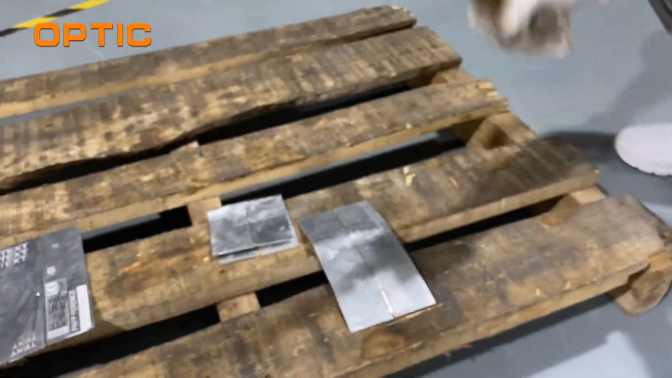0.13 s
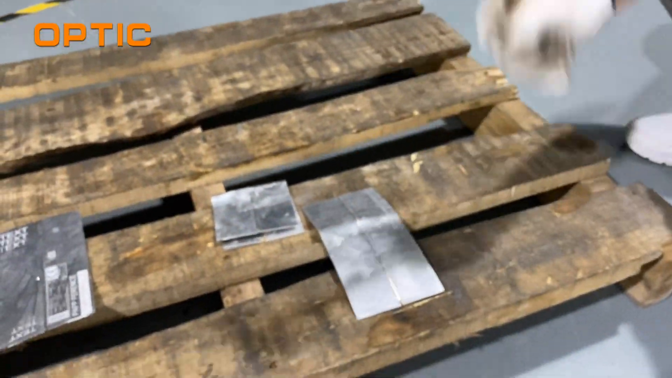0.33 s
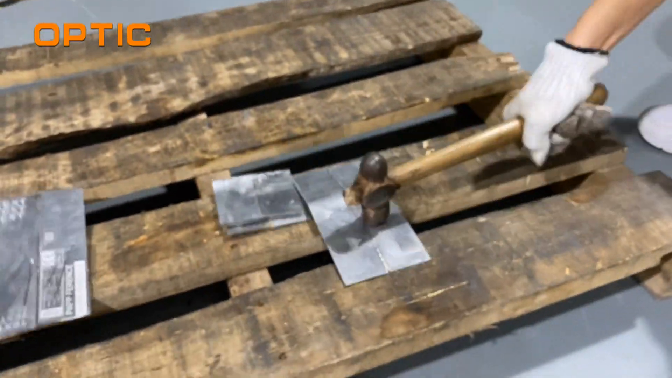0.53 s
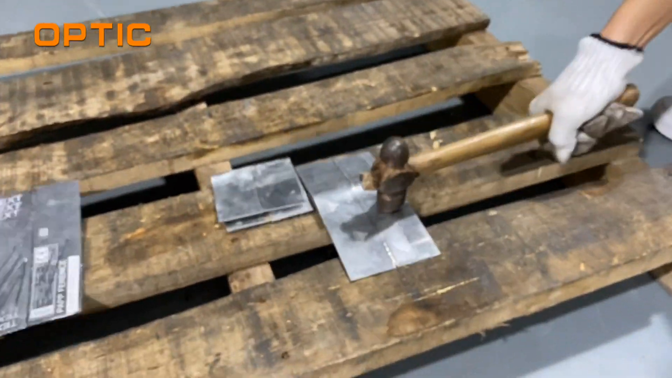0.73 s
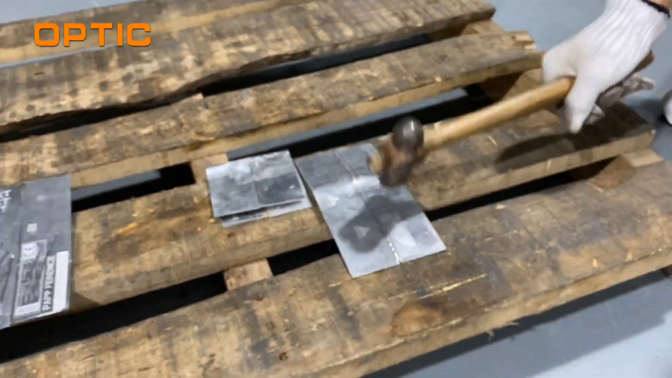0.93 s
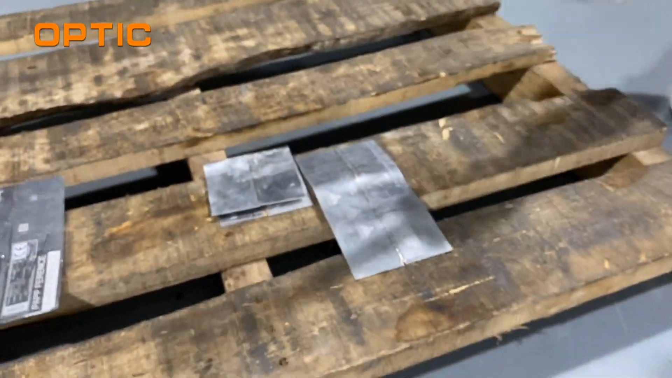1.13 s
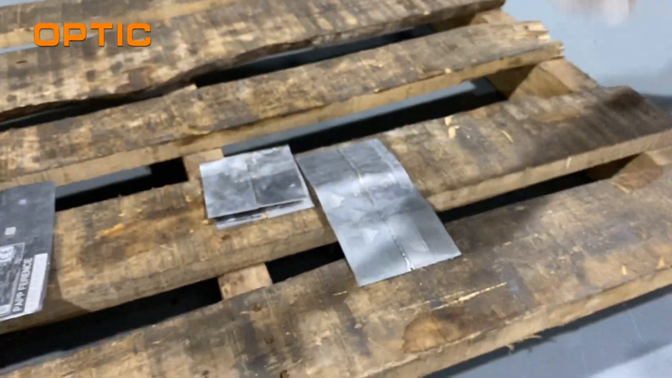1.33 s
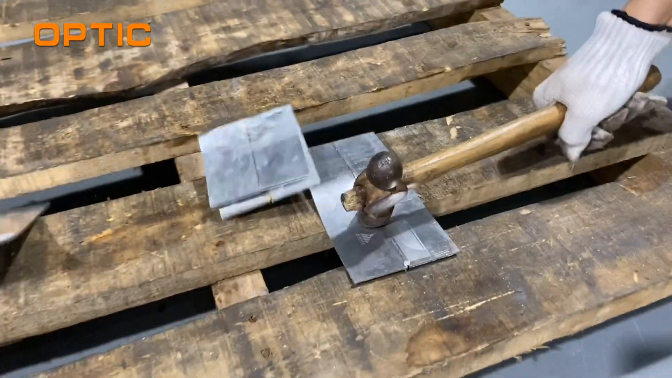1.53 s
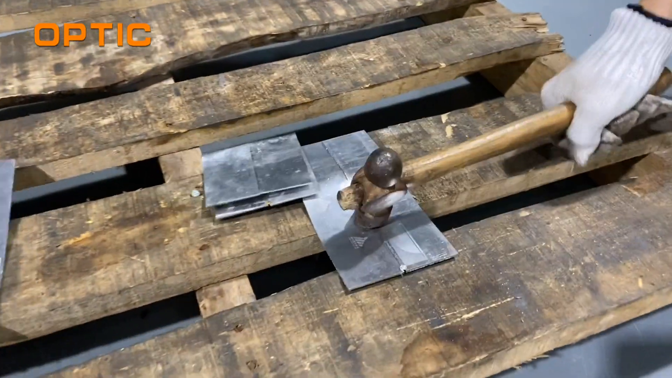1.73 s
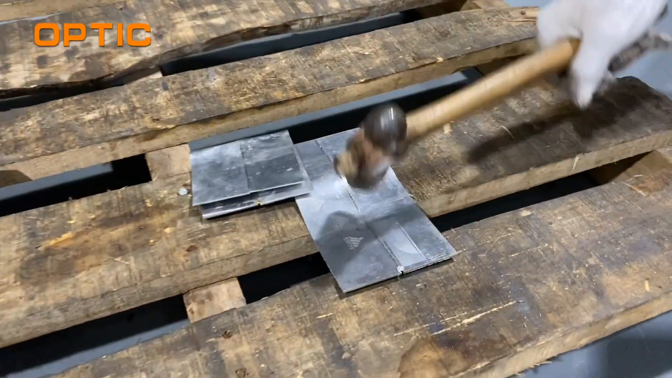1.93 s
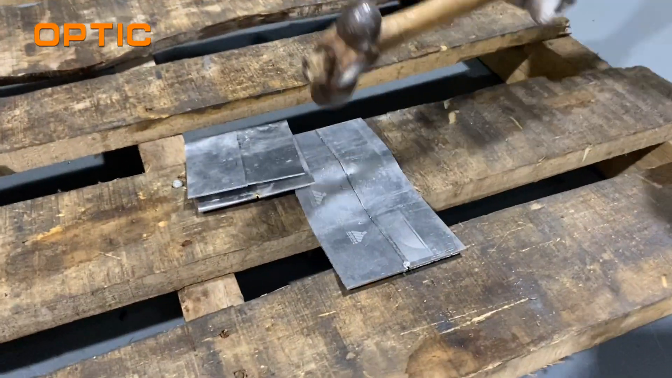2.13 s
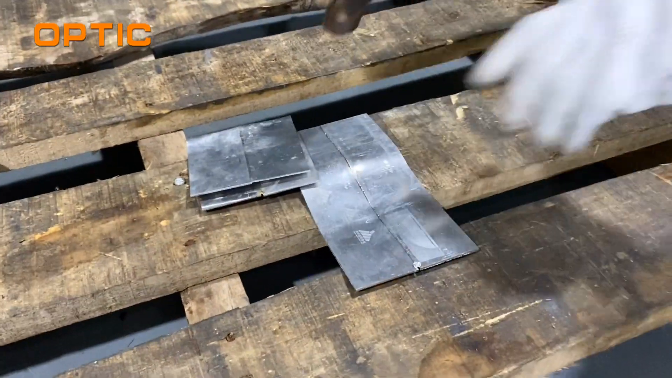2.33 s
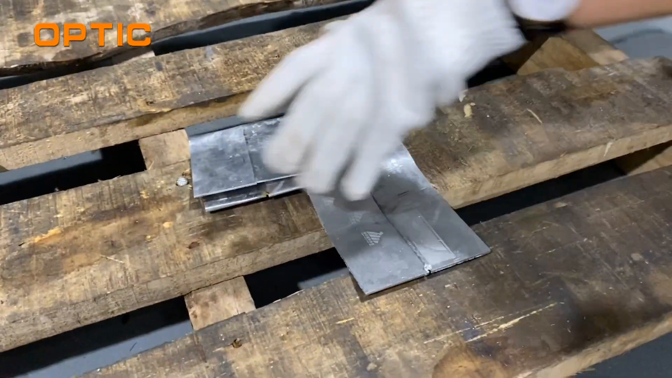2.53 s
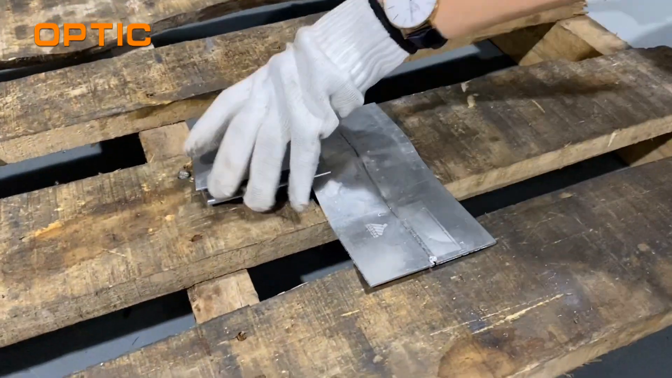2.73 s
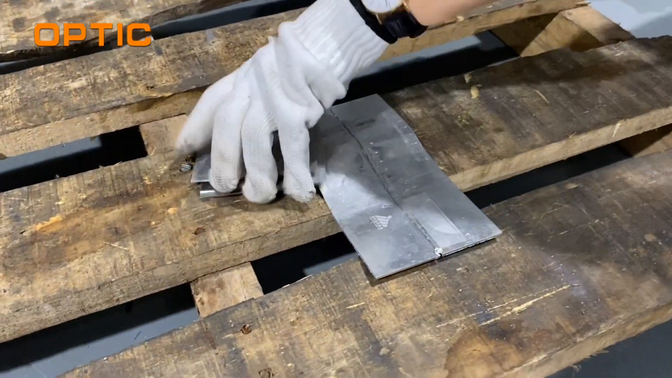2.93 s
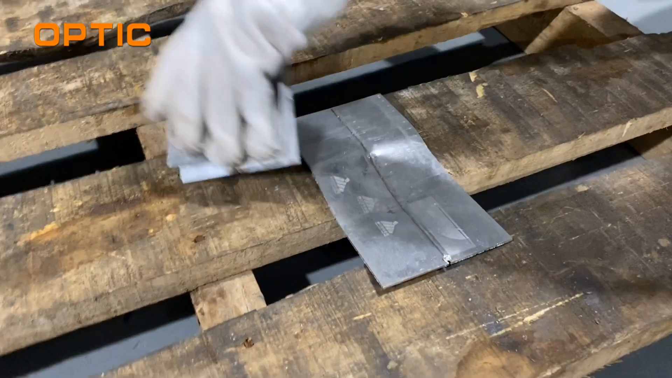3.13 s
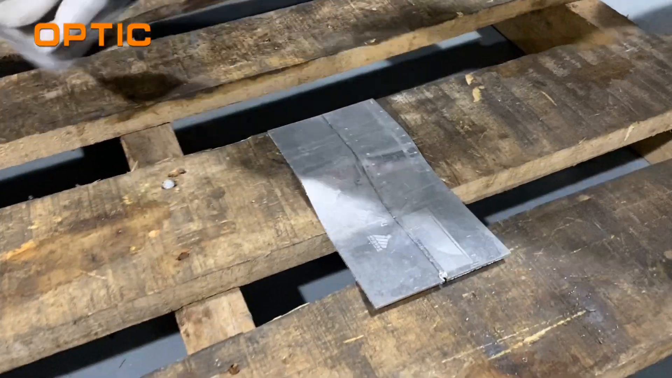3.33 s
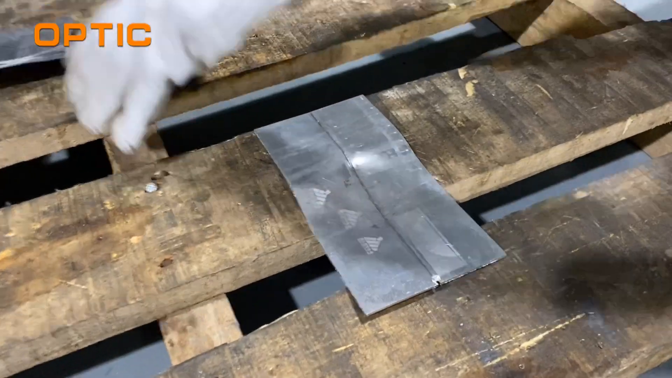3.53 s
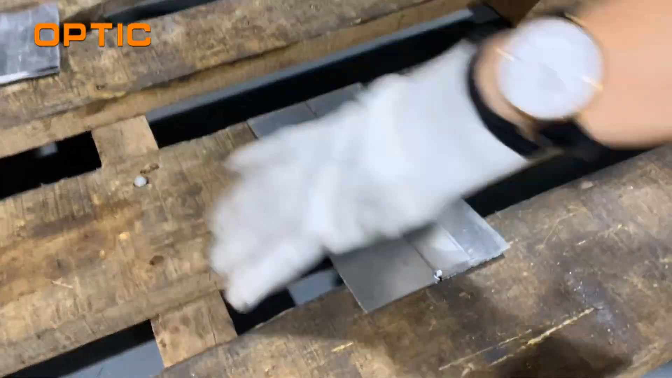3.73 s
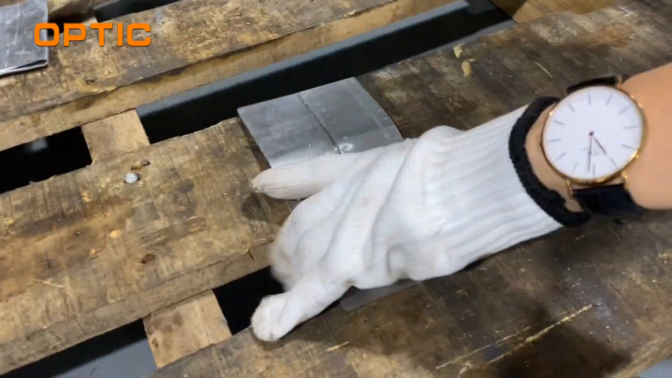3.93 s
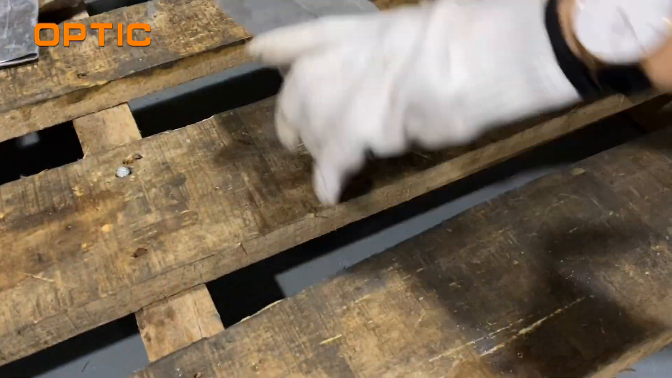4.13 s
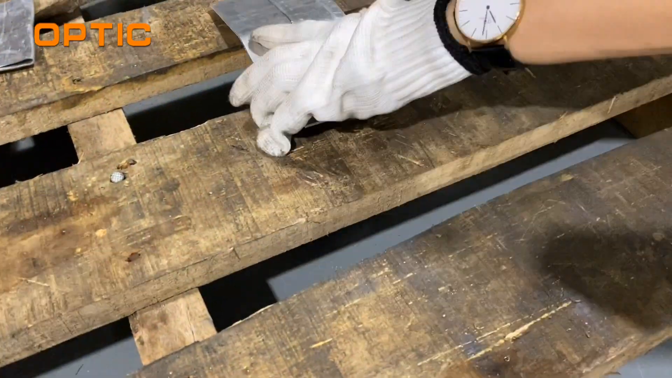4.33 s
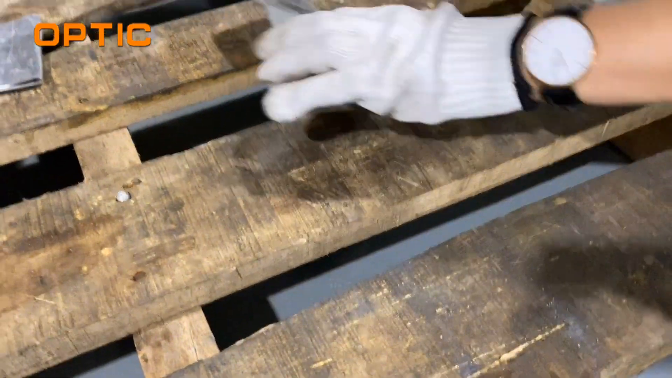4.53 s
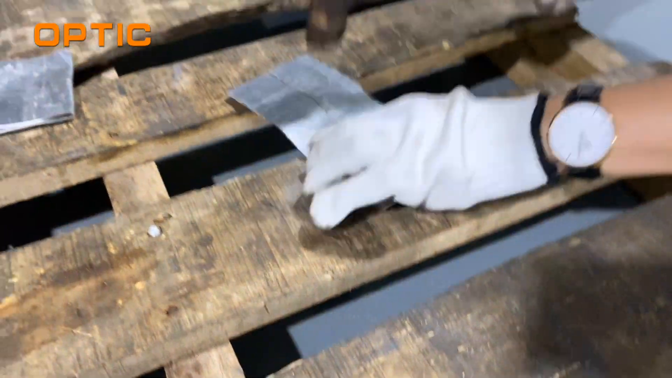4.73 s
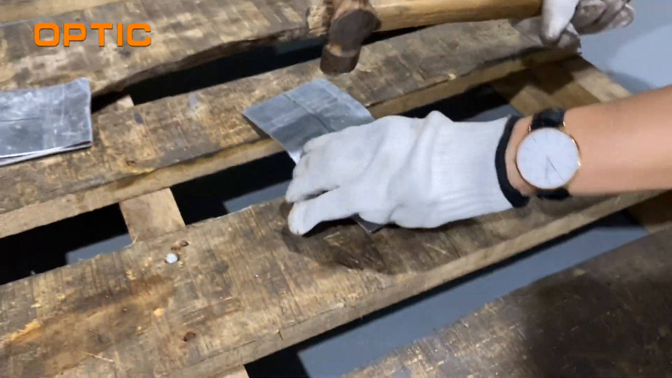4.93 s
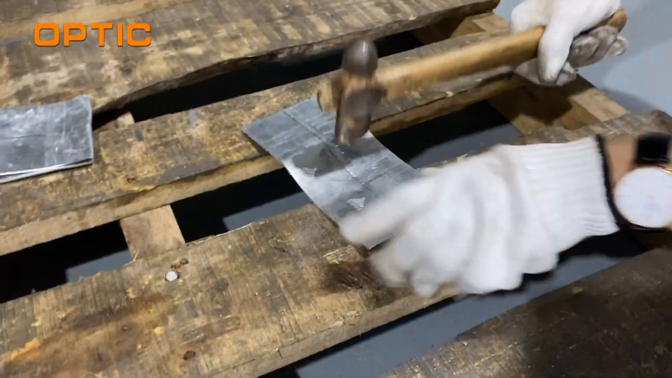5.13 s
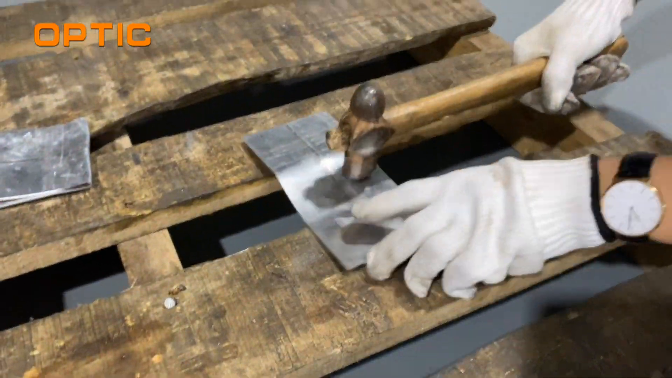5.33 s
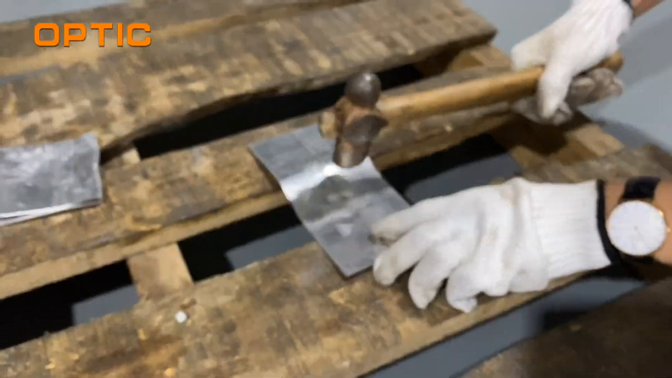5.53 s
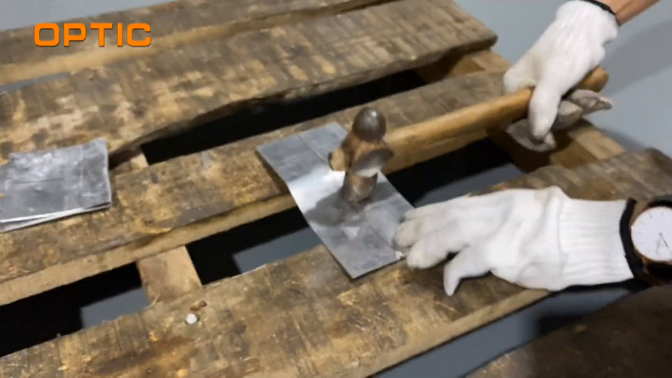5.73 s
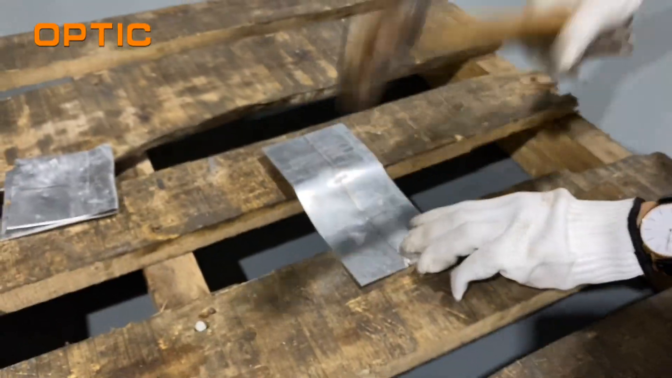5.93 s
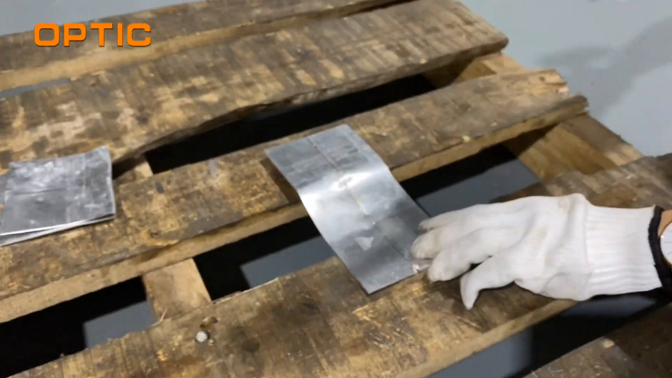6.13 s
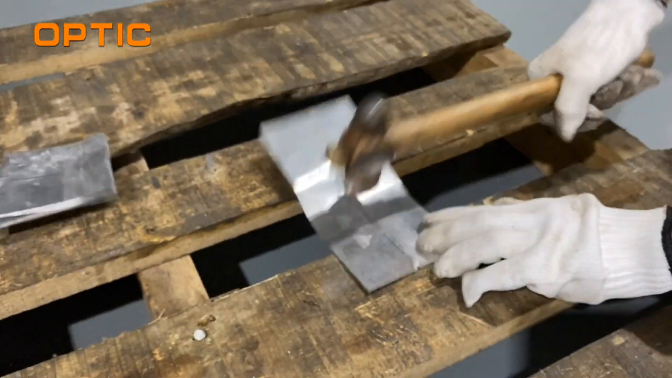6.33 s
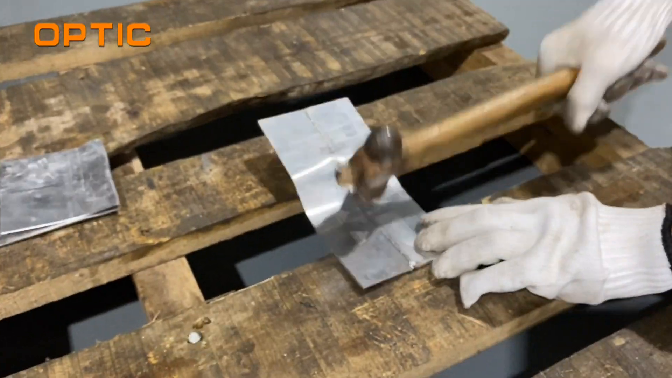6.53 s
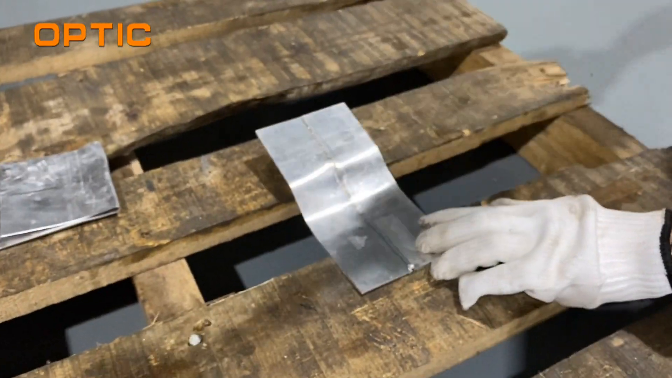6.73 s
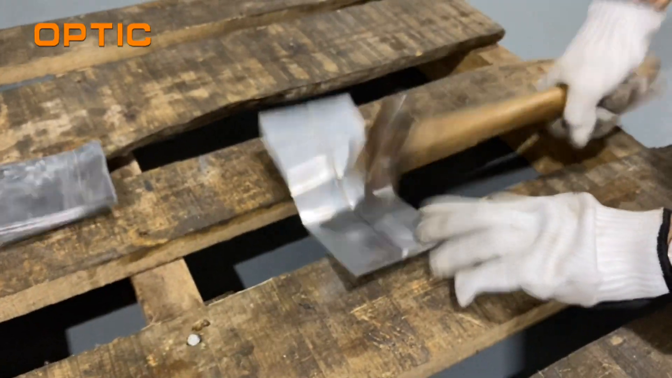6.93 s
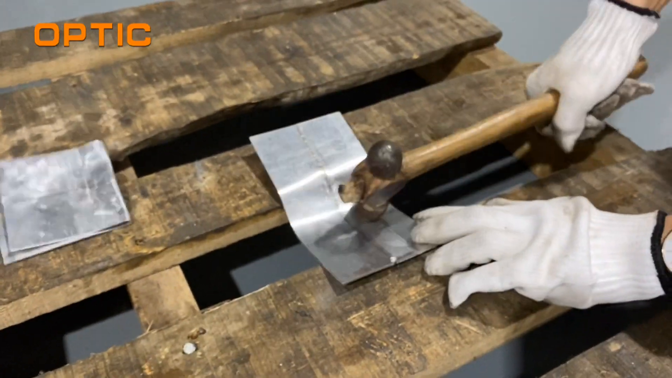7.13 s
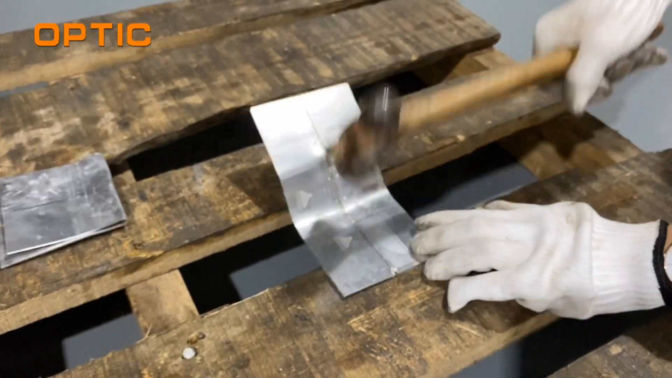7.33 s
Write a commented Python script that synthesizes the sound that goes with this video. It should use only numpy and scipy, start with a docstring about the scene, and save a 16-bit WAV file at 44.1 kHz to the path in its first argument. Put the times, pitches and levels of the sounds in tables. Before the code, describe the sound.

A low, slightly fluttering ventilation rumble fills a reverberant workshop, with the echo of an earlier blow fading at the start. At 0.46 s a hammer hits thin aluminium on a wooden pallet: a loud, bright, noisy crack with short plank thud and boom, rebounding at 0.54 s while a loose folded piece rattles until about 0.7. A second blow at 1.47 rebounds at 1.54, with clinks to 1.8. The echo dies away. Around 2.9-3.2 faint scrapes on wood; at 3.48-3.75 the tossed piece clinks, rings and rocks to rest. Soft sliding at 4.4 and 4.7, then the sheet lands with a hollow knock at 4.76. Light taps with bounces come at 5.2 and 5.7, then heavy cracks at 6.3 and 6.98, each rebounding about 0.1 s later, echo continuing to the end near 7.4. The close stereo microphone ducks after loud hits and recovers.

```python
"""Hammering a folded aluminium sheet

Over ventilation (coloured noise), a hammer on sheet and pallet rebounds: noise cracks and damped modes.
A folded piece jumps and is tossed aside, ticking, ringing and rocking to rest; the sheet is laid down knocking.
A glove slides metal over wood: grainy noise excites its damped modes. Decaying noise gives the workshop's echo.
The camera's gain control ducks loud sounds, then slowly recovers."""
import sys
import numpy as np
from scipy import signal
from scipy.fft import rfft, irfft, next_fast_len
from scipy.io import wavfile
from scipy.ndimage import uniform_filter1d, minimum_filter1d, map_coordinates

SR = 44100
rng = np.random.default_rng(int(sys.argv[2]) if len(sys.argv) > 2 else 0)


def master_out(mix):
    """Clip the mix to full scale and print it as 16-bit PCM to the path in sys.argv[1]."""
    frames = np.transpose(np.atleast_2d(mix))
    ceiling = np.clip(frames, -1, 1)
    pcm = np.round(ceiling * 32767).astype(np.int16)
    wavfile.write(sys.argv[1], SR, pcm)


N = 325458  # length [samples]
LEAD = SR  # samples before time zero, in which an earlier blow starts its echo

# All levels are relative [dB]; t60 is the time to decay by 60 dB.
# ventilation spectrum: (frequency [Hz], density [dB/Hz])
AIR_SPECTRUM = [(22, -41.5), (40, -8), (90, 0), (125, -3), (160, 1.5), (190, -9.5), (250, -16.5),
                (320, -10), (500, -20), (1200, -27.5), (3000, -39), (7000, -50), (16000, -68.5)]
# ventilation strength: (time [s], level [dB])
AIR_LEVEL = [(0, -42), (1.2, -44), (3, -49), (7.3, -41.5)]
# left-right likeness of ventilation and scraping: (frequency [Hz], coherence [0-1])
AIR_COHERENCE = [(100, .95), (290, 0.85), (640, 0.31), (1400, 0.17), (8000, 0.097)]

# hammer blows and rebounds: (time [s], level [dB], hardness [dB], plank thud [dB], pallet boom [dB],
#   ping [Hz], ping level [dB], rebound time [s], rebound level [dB], rebound hardness [dB],
#   rebound ping [Hz], rebound ping level [dB])
BLOWS = [(-.56, -4.5, 13, -5, -23, 1620, -9, -.48, -22, 5, 2150, -9),
         (.4602, -3.5, 4.5, -8.5, -7.5, 2112, -9, .541, -15.5, 13, 2050, -9),
         (1.4712, -8.5, 7, -5.5, -10.5, 740, -8, 1.5426, -18, 4.5, 1580, -9),
         (5.208, -25, 8.5, -22, -19.5, 3150, -9, 5.277, -24.5, 6, 3900, -9),
         (5.686, -19.5, 4, -28, -26.5, 1937, -8, 5.7592, -20, 0, 3590, -8),
         (6.2974, -7, 7, -3, -19, 6180, -15, 6.4125, -14, 7, 3440, -11),
         (6.981, -5.3, 3.5, 0, -17, 2120, -7, 7.09, -16.5, -8, 590, -6)]
# the plank with the sheet pressed on it: (frequency [Hz], level [dB], t60 [s])
PLANK_MODES = [(540, 1, 0.042), (657, -2, .05), (800, 4, 0.025), (955, 4.5, 0.045), (1168, 2.5, 0.028),
               (1620, -.5, 0.02), (2134, -3, 0.04), (3330, -3, 0.022), (3950, -9, .04), (5400, -11, 0.042),
               (6200, -11.5, 0.06), (7100, -12, .04), (9800, -12, .03)]
# the plank bending as a whole, and the pallet under it: (frequency [Hz], level [dB], t60 [s])
THUD_MODES = [(285, 0, .035), (360, 2, 0.028), (455, 4, 0.032)]
# the whole pallet: (frequency [Hz], level [dB], t60 [s])
PALLET_MODES = [(68, 0.5, 0.05), (117, 2.5, 0.045), (235, -2, .025)]
# the sheet ringing freely: (frequency [Hz], level [dB], t60 [s])
SHEET_MODES = [(497, 1, 0.11), (775, -16, 0.45), (945, 1.5, 0.16), (1070, -1.5, 0.054), (1190, -1, 0.08),
               (1290, -6, 0.11), (1680, -5, 0.11), (2347, -16.5, 0.55), (2735, -19, 0.22), (3160, -27, .8),
               (3980, -21, 0.12), (6170, -32, .3), (6470, -31, .25)]
# noise of a blow on the sheet: (frequency [Hz], density [dB/Hz])
CRACK_SPECTRUM = [(60, -13.5), (300, -2), (1000, 2.5), (1400, -.5), (2100, 0), (2700, -2.5), (3400, -1),
                  (4600, -5), (6000, -4.5), (10000, -10), (15000, -17.5)]
# a heavier blow stays longer in contact: length at 0 dB [s], growth [dB per dB]
CONTACT_S, CONTACT_GROWS = 0.01, .6
RISE_SHARE = 0.07  # rise time over contact length
# a short, soft sound swells just before each blow: lead and length [s], level [dB],
# extra growth [dB per dB], rise time [s]
LEAD_IN_S, LEAD_IN_DB, LEAD_IN_GROWS, LEAD_IN_RISE_S = .006, -4, 1.1, .007
# the rebound lands askew: its contact is longer and it moves the wood less
ASKEW_STRETCH, ASKEW_WOOD_DB = 1.6, -4.5
# one last dull hop: flight over the first, level re rebound [dB], contact [s]
SETTLE_SHARE, SETTLE_DB, SETTLE_S = 0.43, -9, 0.032
SOFT_HARD_DB = -3.5  # hardness of the lead-in and of the last hop
BOOM_PAN_DB = -2.5  # the boom is this much weaker at the left port and stronger at the right
CRUSH = 0.115  # a heavy blow crushes the metal and drowns the modes: dB of crack per dB of level
SNAP_GROWS = -.15  # the bright first touch stands out more in light taps: dB per dB of level
PING_T60 = .038  # [s], one bending mode of the sheet, brought out by the strike spot

# loose metal touching the boards: (time [s], level [dB], share of free ring time [0-1], hardness [dB])
TOUCHES = [(.485, -18, 0.6, -1), (.503, -20, .4, -1), (.537, -17, 0.55, 2.5), (.551, -16, 0.5, 5),
           (.59, -22, 0.5, 6), (.69, -35.5, 0.2, 3), (1.492, -21, .4, -2), (1.528, -20.5, 0.4, 4),
           (1.546, -24, 0.7, 3), (1.581, -27, 0.4, 4), (1.673, -25, 0.4, 0), (1.699, -25.5, 0.43, 2),
           (1.755, -30, 0.52, 3), (1.822, -37.5, .35, 0.5), (2.99, -50.5, 0, -3.5), (3.041, -48.5, 0.1, -2),
           (3.204, -48, .2, -3.5), (3.479, -29, 0.3, -2), (3.504, -26, 0.62, 6.5),
           (3.519, -25.5, 0.87, 4.5), (3.536, -28.5, .9, 4), (3.58, -34, 1, 0), (3.617, -36.5, 1, 0.5),
           (3.655, -35.5, 0.9, -4), (3.671, -33.5, 0.55, -3), (3.741, -37.5, 0.7, -3),
           (4.341, -60, 0.2, 0.5), (5.281, -36, .9, 0), (5.311, -34.5, 0.8, -2), (5.747, -30.5, 0, -5),
           (6.322, -23, .2, 0), (7.024, -28, 0.1, 4)]
# the folded piece: (frequency [Hz], level [dB], t60 [s])
PIECE_MODES = [(710, -13, 0.45), (942, -10, 0.45), (1650, -9.5, 0.42), (1910, -4, .27), (2290, -7.5, 0.55),
               (2460, -8.5, 0.45), (2800, -10, .25), (3074, -3, 0.2), (3430, -1, 0.26), (4140, 0, 0.24),
               (4420, 0, 0.22), (4700, -3, .08), (5150, -1, 0.26), (5990, -.5, 0.23), (6900, -4, 0.2),
               (8100, -8, 0.088), (9260, -8, .12), (10400, -4.5, .12), (14300, -2, 0.12)]
# noise of a light metal touch: (frequency [Hz], density [dB/Hz])
CHINK_SPECTRUM = [(100, -34), (450, -8), (750, 0), (1300, -3.5), (2000, -1), (5000, -3), (8000, -6),
                  (15000, -8)]
RATTLE_S, RATTLE_DB = .007, -7  # rattling leaves: mean time between ticks, change per tick
PINNED_DB = -9.5  # a piece with no free ring time rings this much less

# the glove pushes metal over wood: (time of the fastest motion [s], level [dB], run-up [s])
PUSHES = [(2.91, -65.5, 0.13), (3.045, -55.5, .04), (3.19, -52.5, 0.066), (4.44, -60.5, 0.06),
          (4.72, -59.5, 0.07)]
# a push swells by this much over its run-up, and falls as much in the stop time
PUSH_SWELL_DB, PUSH_STOP_S = 18.5, 0.033
# metal sliding on wood: (frequency [Hz], density [dB/Hz])
SCRAPE_SPECTRUM = [(200, -20), (900, 3), (2200, 3), (4000, -5), (7500, -3), (15000, -14)]

# the tossed piece rocks on its corners: (time [s], level [dB], pitch of the board [Hz])
ROCKS = [(3.522, -39, 600), (3.595, -41, 580), (3.638, -43, 680), (3.665, -42, 900), (3.684, -43, 700),
         (3.722, -43, 660), (3.757, -43, 720), (3.79, -47, 700)]
# the sheet is laid back on the plank: (time [s], level [dB])
LAID = [(4.6, -52), (4.759, -27.5), (4.7635, -35), (4.7715, -33), (4.783, -36)]

# decay of the workshop's echo: (frequency [Hz], t60 [s])
HALL_T60 = [(150, 0.68), (500, 1.16), (1300, 1.33), (1600, 1.62), (1950, 1.3), (3000, 1.18), (6000, 0.96),
            (10000, 0.6), (15000, 0.42)]
# colour of the echo: (frequency [Hz], level [dB])
HALL_COLOUR = [(100, -18), (300, -2), (700, -.7), (1250, -.5), (1620, -.5), (2400, -1.8), (4000, -2),
               (8000, -3.5), (15000, -6)]
# left-right likeness of the echo: (frequency [Hz], coherence [0-1])
HALL_COHERENCE = [(250, .85), (600, .35), (1500, .05)]
# colour of the whole sound, with dips near 8.4 and 12.2 kHz: (frequency [Hz], level [dB])
COLOUR = [(6800, 0), (8400, -4), (9400, 3), (10700, 3), (12200, -10.5), (13700, 3.5), (15000, 1),
          (16000, -4.5)]
TOP_HZ = 15900  # upper band limit of the whole sound


def amp(db):
    """Logarithmic levels: decibels to amplitude gain."""
    return 10 ** (np.asarray(db) / 20)


def unit(x):
    """Normalised mean power: scale to rms 1."""
    return x / np.sqrt(np.mean(x ** 2) + 1e-20)


def punch(x):
    """Normalised impulse energy: scale a stereo hit to the energy of 10 ms at rms 1."""
    return x / np.sqrt(np.sum(x ** 2) / (2 * SR * .01) + 1e-20)


def along(points, hz):
    """Logarithmic frequency scale: interpolate (frequency, value) points along it."""
    f, v = np.transpose(points)
    return np.interp(np.log(hz + 1), np.log(f + 1), v)


def curve(rows):
    """Linear interpolation: one value per sample from (time, value) rows."""
    return np.interp(np.arange(N) / SR, *np.transpose(rows))


def wobble(rate):
    """Slow random fluctuation: a smooth curve through rate random knots a second."""
    knots = rng.standard_normal(int(N * rate / SR) + 4)
    return map_coordinates(knots, [np.arange(N) * rate / SR])


def filtered(x, response):
    """Linear filtering: multiply the spectrum of x by a response of frequency."""
    n = x.shape[-1]
    m = next_fast_len(n + SR // 8)
    return irfft(rfft(x, m) * response(np.fft.rfftfreq(m, 1 / SR)), m)[..., :n]


def noise(spectrum, coherence, size):
    """Partial coherence: coloured noise of rms 1, mid and side mixed to a given left-right likeness."""
    def mid_side_gains(hz):
        angle = np.arccos(np.clip(along(coherence, hz), -1, 1)) / 2
        return amp(along(spectrum, hz)) * [np.cos(angle), np.sin(angle)]
    mid, side = filtered(rng.standard_normal((2, size)), mid_side_gains)
    return unit(np.array([mid + side, mid - side]))


def fade(t, t60):
    """Exponential decay: full level before t = 0, then 60 dB down every t60."""
    return np.exp(-np.log(1000) * np.maximum(t, 0) / t60)


def ring(modes, rise, size):
    """Modal superposition: random strengths per strike; high modes reach the two ports out of step."""
    t = np.arange(size) / SR
    out = np.zeros((2, size))
    for hz, db, t60 in modes:
        strength, detune, skew = rng.standard_normal(3)
        port_skew = skew * min(hz / 4000, 1) * np.array([[1], [-1]])
        phase = rng.uniform(0, 2 * np.pi) + port_skew
        pitch = hz + detune * .5 / t60  # the load of the contact shifts the damped modes most
        out += amp(db + 2 * strength) * fade(t, t60) * np.sin(2 * np.pi * pitch * t + phase)
    return punch(out * (1 - np.exp(-t / rise)))


def damped(modes, share):
    """Added damping: pressing by hand or hammer leaves only a share of the ring time."""
    return np.array(modes) * [1, 1, share]


def folded(modes, spread, count):
    """Beating of near-equal modes: the leaves' clusters widen with frequency."""
    leaves = np.tile(modes, (count, 1))
    hz = leaves[:, 0]
    detune = spread * np.minimum(hz / 3000, 1) * rng.standard_normal(len(hz))
    return np.c_[hz * (1 + detune), leaves[:, 1:]]


def contact(spectrum, length, t60, size):
    """Impact noise: metal chatters for the length of the contact; its treble dies sooner than its body."""
    t = np.arange(size) / SR
    chatter = noise(spectrum, [(400, 0.75), (2000, 0.35), (8000, 0.093)], size=size)
    treble = filtered(chatter, lambda hz: hz ** 2 / (hz ** 2 + 4500 ** 2))
    body = (chatter - treble) * (1 - np.exp(-t / 0.0021)) * fade(t - length, t60)
    return punch(body + treble * fade(t - 0.23 * length, 0.34 * t60))


def snap(t60):
    """Impulsive excitation: a brief bright noise for the first hard touch on aluminium."""
    t = np.arange(SR // 50) / SR
    hiss = noise([(2000, -20), (6000, -2), (15000, 0)], [(8000, .7)], size=len(t))
    return punch(hiss * fade(t, t60))


def hardened(x, db, corner_hz):
    """Contact stiffness: a hard contact lifts the treble, a soft one dulls it."""
    return filtered(x, lambda hz: 1 + (amp(db) - 1) * 1j * hz / (corner_hz + 1j * hz))


def add(track, s, sound):
    """Linear superposition: mix a sound into the track at time s."""
    start = LEAD + round(s * SR)
    part = track[:, start:start + sound.shape[1]]
    part += sound[:, :part.shape[1]]


def hall(x, grain_db=2.5):
    """Reverberation: convolve with a fresh noise tail whose reflections clump and whose t60 varies with pitch."""
    diffuse = noise([(1000, 0)], HALL_COHERENCE, size=3 * SR // 2)
    hz, t, z = signal.stft(diffuse, SR, nperseg=256)
    build_up = 1 - np.exp(-t / 0.0045)
    clumps = amp(grain_db * rng.standard_normal(len(t)))
    decay = fade(t, along(HALL_T60, hz)[:, None])
    tail = signal.istft(z * build_up * clumps * decay, SR, nperseg=256)[1]
    tail = filtered(tail / np.linalg.norm(tail[0]), lambda f: amp(along(HALL_COLOUR, f)))
    return signal.fftconvolve(x, tail, axes=1)


def ventilation(flutter_db=1):
    """Broadband flow noise: a low, slightly unsteady rumble of moving air."""
    gain = amp(curve(AIR_LEVEL) + flutter_db * wobble(8.4))
    return gain * noise(AIR_SPECTRUM, AIR_COHERENCE, size=N) * amp([[-.4], [.4]])


def hammer_contacts():
    """Repeated impact: yield each blow's soft lead-in, strike, rebound and last hop.

    Each is (time [s], level, thud, boom, hardness [dB], ping [Hz], ping [dB], contact [s], rise [s])."""
    def timing(db, stretch=1):
        length = stretch * CONTACT_S * amp(CONTACT_GROWS * db)
        return length, RISE_SHARE * length
    for s, db, hard_db, thud_db, boom_db, ping_hz, ping_db, back_s, back_db, back_hard_db, *back_ping in BLOWS:
        wood, ping = (thud_db, boom_db), (ping_hz, ping_db)
        lead_in_db = db + LEAD_IN_DB + LEAD_IN_GROWS * db
        yield s - LEAD_IN_S, lead_in_db, *wood, SOFT_HARD_DB, *ping, LEAD_IN_S, LEAD_IN_RISE_S
        yield s, db, *wood, hard_db, *ping, *timing(db)
        back_wood = thud_db + back_db - db + ASKEW_WOOD_DB, boom_db + ASKEW_WOOD_DB
        yield back_s, back_db, *back_wood, back_hard_db, *back_ping, *timing(back_db, ASKEW_STRETCH)
        hop_s = back_s + SETTLE_SHARE * (back_s - s)
        hop_timing = SETTLE_S, RISE_SHARE * SETTLE_S
        yield hop_s, back_db + SETTLE_DB, *back_wood, SOFT_HARD_DB, *back_ping, *hop_timing


def hammer(crack_db=-0.1, plank_db=-3.2, sheet_db=-15, snap_db=-13, wet_db=-3.3, modes_wet_db=-7.5,
           wood_wet_db=-6, spill=0.2, lag=.00003):
    """Impact excitation: noise cracks on the sheet, and sheet, plank and pallet modes ring."""
    track, short = np.zeros((2, LEAD + N)), SR // 6
    boom_pan_db = BOOM_PAN_DB * np.array([[1], [-1]])
    port_lag = np.array([[0], [lag]])  # [s], the sheet is slightly nearer to the left port
    for s, db, thud_db, boom_db, hard_db, ping_hz, ping_db, length, rise in hammer_contacts():
        bite = 1 - np.exp(-np.arange(short) / SR / rise)
        crack = contact(CRACK_SPECTRUM, length, t60=0.056, size=short)
        bang = bite * amp(crack_db + CRUSH * db) * crack
        bang[:, :SR // 50] += amp(snap_db + SNAP_GROWS * db) * snap(t60=.018)
        thud = amp(thud_db) * ring(THUD_MODES, rise=0.002, size=short)
        boom = amp(boom_db + boom_pan_db) * ring(PALLET_MODES, rise=0.0028, size=short)
        wood = bite * (thud + boom)
        plank = amp(plank_db) * ring(PLANK_MODES, rise=0.00062, size=short)
        sheet = amp(sheet_db) * ring(damped(SHEET_MODES, 0.3), rise=0.0031, size=short)
        ping = amp(ping_db) * ring([(ping_hz, 0, PING_T60)], rise=0.0006, size=short)
        modes = bite * (plank + sheet + ping)
        bang, modes = hardened(np.array([bang, modes]), hard_db, corner_hz=2600)
        direct = filtered(bang + wood + modes, lambda hz: np.exp(-2j * np.pi * hz * port_lag))
        add(track, s, amp(db) * direct)
        # under a heavy blow all the boards radiate, so more spills into the room; single modes carry less far
        to_room = bang + amp(wood_wet_db) * wood + amp(modes_wet_db) * modes
        add(track, s, amp(db + wet_db + spill * db) * hall(to_room))
    return track[:, LEAD:] * amp([[.5], [-.5]])


def loose_piece(tick_db=-2.8, ring_db=1.7, snap_db=-11, wet_db=-5, pan_db=1.1, count=3):
    """Multiple impacts on coupled leaves: each touch ticks and rattles, and near-equal modes beat."""
    track = np.zeros((2, LEAD + N))
    for s, db, free, hard_db in TOUCHES:
        free = np.clip(free, .05, 1)
        leaves = folded(damped(PIECE_MODES, free), spread=.014, count=3)
        touch = amp(ring_db + PINNED_DB * (1 - free)) * ring(leaves, rise=0.0012, size=SR // 3)
        touch[:, :SR // 50] += amp(snap_db) * snap(t60=.02)
        add(track, s, amp(db) * hardened(touch, hard_db, corner_hz=4000))
        for k in range(count):
            tick = contact(CHINK_SPECTRUM, 0.0019, t60=0.028 + 0.14 * free, size=SR // 8)
            tick_s = s + RATTLE_S * k * rng.uniform(.6, 1.4)
            gain = amp(db + tick_db + k * RATTLE_DB)
            add(track, tick_s, gain * hardened(tick, hard_db, corner_hz=4000))
    near = track[:, LEAD:]
    return near * amp([[pan_db], [-pan_db]]) + amp(wet_db) * hall(near)[:, :N]


def pushing():
    """Speed-dependent friction: loudness swells as each push gathers speed, then stops short."""
    t = np.arange(N) / SR
    total = np.zeros(N)
    for s, db, run_up in PUSHES:
        away = np.maximum((s - t) / run_up, (t - s) / PUSH_STOP_S)
        total += amp(db - PUSH_SWELL_DB * away)
    return total


def sliding(grain_db=3.0, sing_db=3, glove_db=-14, wet_db=-6):
    """Friction excitation: metal catches on the wood grain as it is pushed, and its damped modes sing."""
    scrape = unit(noise(SCRAPE_SPECTRUM, AIR_COHERENCE, size=N) * amp(grain_db * wobble(380)))
    metal = ring(damped(PIECE_MODES, .18), rise=.0005, size=SR // 6)
    gloved = hardened(metal, glove_db, corner_hz=2500)
    song = unit(signal.fftconvolve(scrape, gloved, axes=1)[:, :N])
    near = pushing() * unit(scrape + amp(sing_db) * song)
    return near + amp(wet_db) * hall(near)[:, :N]


def rocking(t60=.06, wet_db=-8):
    """Local resonance: the tossed piece rocks to rest, each corner knocking the board at its own pitch."""
    track = np.zeros((2, LEAD + N))
    for s, db, hz in ROCKS:
        knock = ring([(hz, 0, t60), (1.3 * hz, -4, t60)], rise=.002, size=SR // 6)
        add(track, s, amp(db) * knock)
    near = track[:, LEAD:]
    return near + amp(wet_db) * hall(near)[:, :N]


def sheet_laid(knock_db=-1, ring_db=-2, soft_hz=1300, wet_db=-10.5):
    """Soft impact: the sheet meets the wood corner by corner with a hollow knock and rings on."""
    track = np.zeros((2, LEAD + N))
    for s, db in LAID:
        crack = .6 * contact(CRACK_SPECTRUM, .005, t60=.07, size=SR // 6)
        wood = crack + ring(PLANK_MODES + THUD_MODES[:1], rise=.001, size=SR // 6)
        knock = punch(filtered(wood, lambda hz: 1 / (1 + 1j * hz / soft_hz)))
        add(track, s, amp(db + knock_db) * knock)
        leaves = folded(damped(SHEET_MODES, .8), spread=.005, count=3)
        add(track, s, amp(db + ring_db) * ring(leaves, rise=.001, size=SR // 2))
    near = track[:, LEAD:] * amp([[1.6], [-1.6]])
    return near + amp(wet_db) * hall(near)[:, :N]


def scene():
    """Superposition: everything that reaches the two microphone ports."""
    return ventilation() + hammer() + loose_piece() + sliding() + rocking() + sheet_laid()


def gain_control(x, limit_db=-8.5, hold=0.19, release_db=58):
    """Dynamic compression: gain drops at once on a loud sound, holds, then recovers by release_db a second."""
    power = np.abs(uniform_filter1d(np.mean(x ** 2, axis=0), size=SR // 200))
    needed = np.minimum(limit_db - 10 * np.log10(power + 1e-12), 0)
    half = int(hold * SR / 2)
    held = minimum_filter1d(needed, 2 * half + 1, origin=half - SR // 300)  # looks 1/300 s ahead
    ramp = release_db * np.arange(N) / SR
    gain_db = np.minimum.accumulate(held - ramp) + ramp
    return x * amp(uniform_filter1d(gain_db, size=SR // 400))


def record(dry):
    """Linear and nonlinear response: overall colour, gain control, rounded peaks and band limits."""
    def colour_response(hz):
        return amp(along(COLOUR, hz)) * hz ** 4 / (hz ** 4 + 31 ** 4)  # no deep bass
    x = gain_control(filtered(dry, colour_response))
    x = x / (1 + np.abs(x / .88) ** 6) ** (1 / 6)
    return filtered(x, lambda hz: 1 / np.sqrt(1 + (hz / TOP_HZ) ** 160))


dry = scene()
out = record(dry)
master_out(out)
```